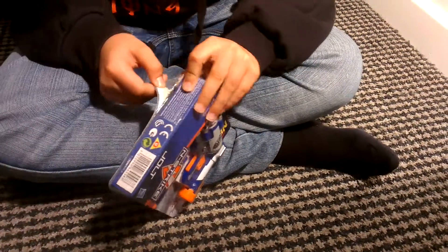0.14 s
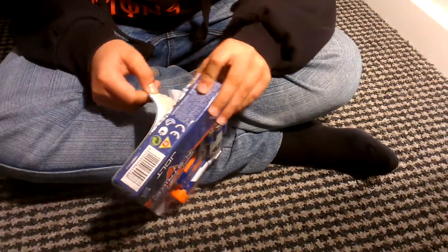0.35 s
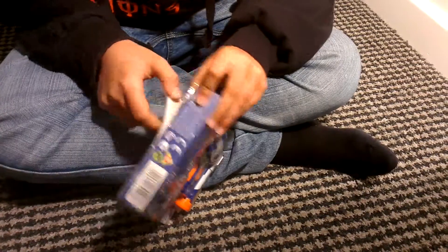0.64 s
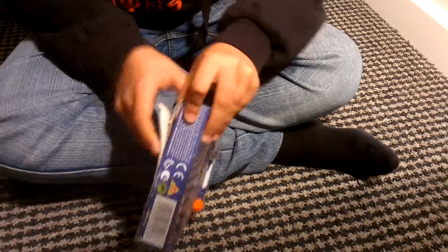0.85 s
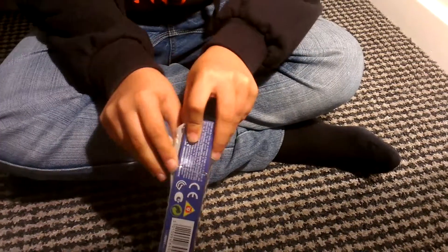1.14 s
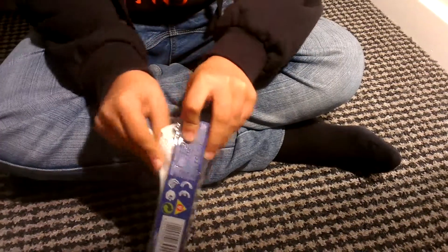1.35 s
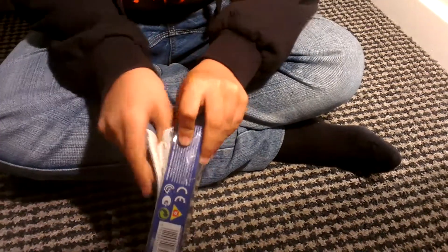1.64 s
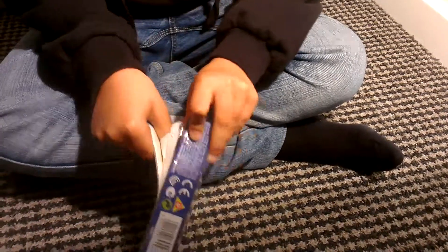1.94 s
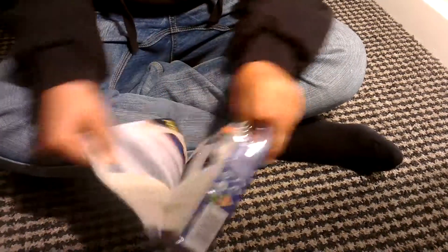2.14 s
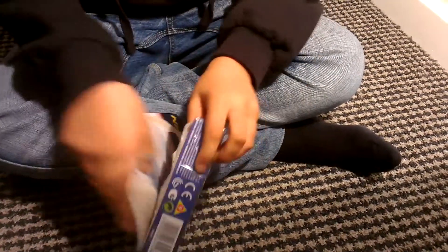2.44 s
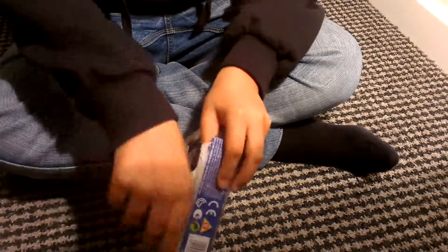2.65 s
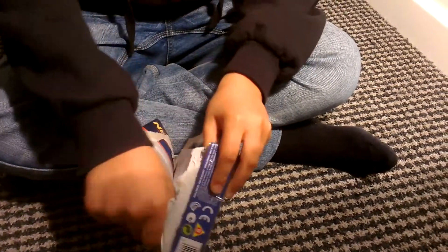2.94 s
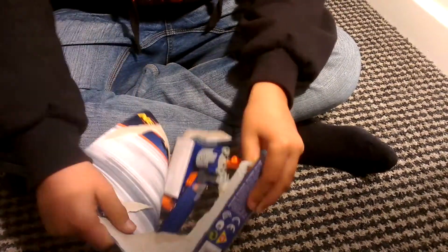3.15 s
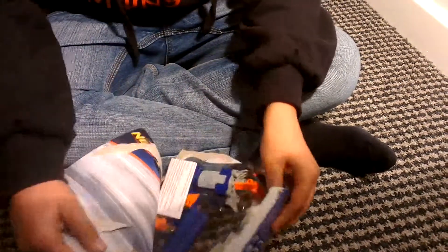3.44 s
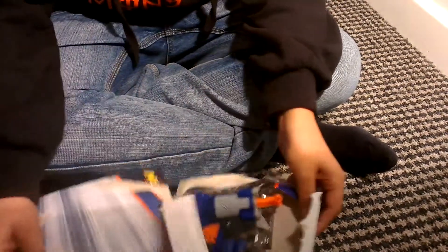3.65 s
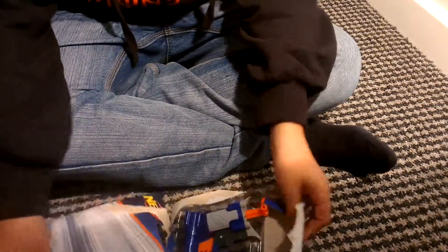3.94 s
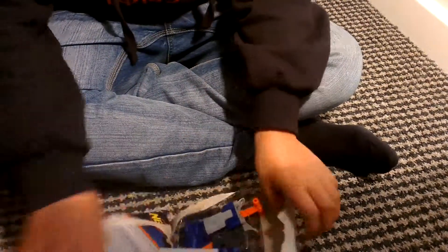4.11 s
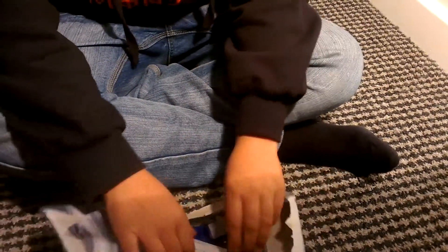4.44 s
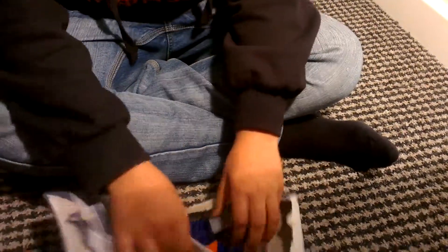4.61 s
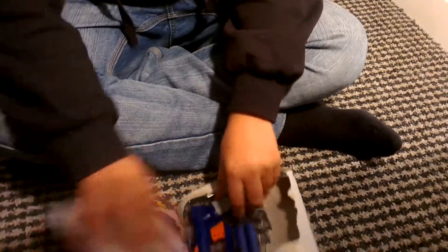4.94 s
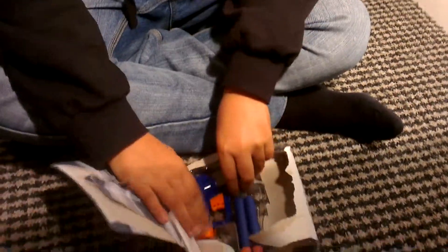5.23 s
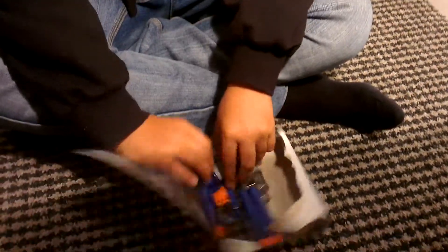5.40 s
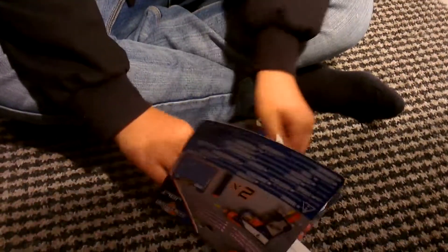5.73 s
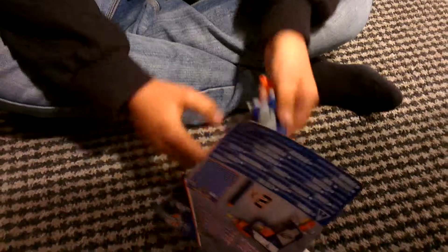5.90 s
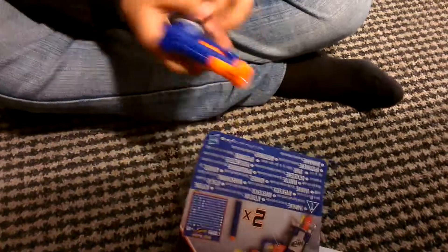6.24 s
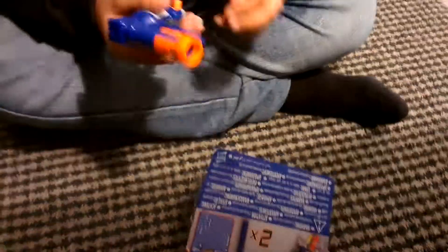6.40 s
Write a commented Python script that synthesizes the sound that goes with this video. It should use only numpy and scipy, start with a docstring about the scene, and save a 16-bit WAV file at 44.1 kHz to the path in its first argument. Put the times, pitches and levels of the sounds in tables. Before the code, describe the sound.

Stiff card and plastic packaging crackles, rips and snaps as it is pulled open, then rustles more softly.

```python
"""On a carpet, close to two microphones and nearer the left, hands tear open a card-and-plastic toy pack.
Tearing fibres and rubbing give a dense crackle of tiny clicks that swells with each rip, slide and scrape;
creases and the plastic shell snap now and then. Three streams of clicks, loosely bunched together,
sound as card panel (low), creak (middle) and fizz (high).
Nearby surfaces smear the sound, and a faint hiss lies underneath."""
import sys
import numpy as np
from scipy import signal
from scipy.fft import rfft, irfft
from scipy.io import wavfile
from scipy.ndimage import uniform_filter1d

SR = 44100
rng = np.random.default_rng(int(sys.argv[2]) if len(sys.argv) > 2 else 0)


def wrap_up_sound(samples):
    """Save the sound to the file named by the first command line argument, as 16-bit audio."""
    columns = np.atleast_2d(samples).T
    # keep every value between -1 and 1, then stretch to whole-number steps
    tamed = np.clip(columns, -1, 1)
    steps = np.round(tamed * 32767).astype(np.int16)
    wavfile.write(sys.argv[1], SR, steps)


N = 289416
T, HZ = np.arange(N) / SR, np.fft.rfftfreq(N, 1 / SR)

# Rips, slides and scrapes. Each row: start and swell time in seconds, swell in dB, peak creak drive in dB,
# panel and fizz in dB over the creak, nominal seconds to fade 20 dB (negative cuts the swell short).
HAND_STROKES = [(.05, 0.065, 12.5, -55, -29, 15, 0.0579), (0.198, 0.083, 10.5, -51, -15, 11.5, 0.0146),
                (.278, 0.0512, 5, -45, -16, 14.5, 0.0269), (0.494, 0.0123, 2.5, -62.5, 0.5, 2.5, 0.08),
                (.65, 0.0838, 21, -68, -2, 5.5, 0.2248), (1.14, 0.0476, 10, -60, -4.5, 4.5, 0.097),
                (1.282, 0.0055, -7, -42.5, -6, -2, 0.101), (1.604, 0.0454, 9, -61.5, -2, 1, 0.1041),
                (1.765, 0.0184, 13.5, -73.5, -1, -4, 0.07), (1.87, 0.0392, 12.5, -65, -3.5, 0, 0.03),
                (1.95, 0.044, 9, -71, -8.5, 3, 0.27), (2.049, 0.0805, 14.5, -17, -4, 3.5, 0.051),
                (2.129, 0.0308, 2.5, -24.5, 5, -19, 0.0441),
                (2.199, 0.01785, 26.5, -28.5, -1, -31.5, 0.0559), (2.323, 0.0285, 2.5, -47, 1, -17.5, 0.13),
                (2.42, 0.02, 6, -54.5, -5.5, -3, 0.46), (2.57, 0.02, 5.5, -57, -1.5, -20.5, 0.86),
                (2.999, 0.0173, 4.5, -26.5, 2, 8.5, 0.0608), (3.03, 0.0273, 0.5, -26, -4, 2.5, 0.0448),
                (3.084, 0.022, 21, -16, -2.5, -6.5, 0.0555), (3.228, 0.09735, 29.5, -26.5, -5.5, 5.5, .05),
                (3.364, 0.0081, 9, -46.5, 4, -9, 0.0719), (3.488, 0.0292, 6.5, -29.5, 1.5, -0.5, 0.0303),
                (3.518, 0.00237, -2, -21, 3, -11, 0.0433), (3.53, 0.0349, 3.5, -25.5, -1.5, 5.5, 0.0322),
                (3.568, 0.026, 1, -29.5, 1, -4.5, 0.0528), (3.742, 0.0046, -6, -39, 0.5, -15, 0.0952),
                (3.97, 0.0273, 7.5, -56, 0.5, -13.5, 0.3723),
                (4.025, 0.01686, 29, -34.5, -2.5, -9.5, 0.0556), (4.2, 0.0754, 12.5, -48.5, -10, 2, .15),
                (4.31, 0.027, 3.5, -59.5, -20, 8.5, 0.28), (4.399, 0.02774, 41, -40.5, -2, -21.5, 0.0917),
                (4.58, 0.048, 7, -55.5, -5, 3.5, 0.27), (4.859, 0.0215, 13.5, -46.5, -2.5, -6, 0.058),
                (4.983, 0.0074, 6, -43, 6, -10.5, 0.0511), (4.98, 0.0596, 4.5, -55, -12, 10.5, 0.027),
                (5.081, 0.0706, 5, -53.5, -8, 1, 0.0332), (5.2, 0.0411, 3, -62, -3, -4, -0.0053),
                (5.3, 0.0695, 22, -56.5, -0.5, -5.5, 0.1429), (5.4, 0.105, 7, -57.5, -4, -3, 0.0417),
                (5.57, 0.034, 6.5, -63.5, -5, -4, 0.16), (5.681, 0.0304, 5, -56, -8.5, -12, 0.1654),
                (5.82, 0.0737, 18.5, -56, -5.5, -6, 0.1223), (5.97, 0.015, 10, -66, -1, -8.5, 0.1753),
                (6.031, 0.0362, 19, -54, -6, 0, 0.0519), (6.19, .012, 4.5, -63, -8.5, -4, 0.1134)]
# Quiet handling between the strokes. Each row: time in seconds, creak drive in dB.
QUIET_HANDLING = [(0, -54.5), (.2, -63), (.42, -67.5), (.6, -90.5), (.72, -76), (0.859, -56.5),
                  (1.0, -67.5), (1.12, -84), (1.85, -87), (2.04, -84), (2.239, -58.5), (2.981, -59.5),
                  (3.8, -59), (3.89, -81.5), (3.96, -58.5), (4.4, -60), (4.7, -59), (5.2, -61), (5.27, -84),
                  (5.36, -67.5), (5.56, -78), (5.7, -65), (5.81, -75.5), (6.05, -76), (6.139, -84),
                  (6.28, -84), (6.36, -94), (6.56, -87)]
# Snaps of creases and shell. Each row: start in seconds, creak in dB, panel and fizz in dB over the creak
# (all before trims), panel pitch in Hz, nominal seconds to die away by 60 dB.
PACK_SNAPS = [(0.088, -52.5, -10, 11, 940, 0.043), (0.117, -55.5, -6.5, 11.5, 947, 0.058),
              (0.205, -41, -22, 8, 1220, 0.0234), (0.227, -49.5, -8, 12, 930, 0.05),
              (0.289, -39, -3, 12.5, 889, 0.232), (0.4316, -43, -30.5, -3, 1270, 0.076),
              (0.4489, -36.5, 9, -26, 915, 0.0644), (0.5013, -54.5, 3, -5.5, 892, 0.12),
              (0.8804, -35, 0.5, -7, 824, 0.0484), (0.9259, -32.5, -7.5, 7.5, 898, 0.0488),
              (0.9415, -44, -8, -8.5, 930, 0.096), (1.017, -51, -2.5, 6, 824, 0.145),
              (1.1606, -51, -4.5, -5.5, 1262, 0.203), (1.285, -22.5, -19, 8, 960, 0.0695),
              (1.2876, -26.5, 6, -18.5, 1094, 0.0264), (1.304, -53, -22, 15, 1087, 0.135),
              (1.472, -51, -2.5, -37, 931, 0.0706), (1.6015, -55, 16, 0.5, 843, 0.059),
              (1.9103, -50.5, -20, -18.5, 1195, 0.052), (2.0496, -20.5, -4, -27, 826, 0.102),
              (2.136, -19.5, -22, -3, 810, 0.108), (2.1495, -7.5, -3, -4.5, 925, 0.0594),
              (2.207, -17.5, -28, -17, 770, 0.0414), (2.2209, -11, -18, -29, 676, 0.035),
              (2.2802, -35, -11, -23, 822, 0.151), (2.3279, -22, -9.5, -1, 677, 0.0737),
              (2.3482, -13.5, -5, -10.5, 832.6, 0.0309), (2.5302, -35.5, -2.5, -9, 698, 0.08),
              (2.572, -23, -7.5, -19, 801, 0.065), (2.5936, -31, 2, -16, 1071, 0.0677),
              (2.6998, -27.5, -2.5, -7.5, 1048, 0.0582), (2.8666, -32.5, -10, -0.5, 678, 0.0453),
              (2.9307, -24, -7.5, -5.5, 1127, 0.0386), (2.9985, -14.5, -2.5, -2, 775, 0.106),
              (3.0487, -4.5, -12.5, -15.5, 931, 0.0623), (3.1045, -3.5, -4.5, -13, 872, 0.0518),
              (3.1804, -35.5, -4, -10, 891, 0.133), (3.3726, -16, -12, -1, 928, 0.0202),
              (3.4486, -27, -1.5, 5.5, 631, 0.0423), (3.4717, -28.5, -17.5, -11, 608.8, 0.103),
              (3.495, -23, 2.5, 2.5, 1104, 0.049), (3.5104, -15, 2.5, 3, 870, 0.113),
              (3.5188, 0.5, -14, -11.5, 755, 0.08), (3.5594, -7.5, -25, -2.5, 1080, 0.053),
              (3.6563, -23, -3.5, -22.5, 670, 0.0285), (3.7059, -56.5, 21.5, -2, 657, 0.11),
              (3.7434, -9.5, -0.5, -12, 763.5, 0.0337), (3.7955, -27, 6, -4, 949, 0.0348),
              (3.936, -28, 5.5, -41, 1401, 0.0409), (3.9666, -45, -1.5, -9.5, 1063, 0.138),
              (4.0105, -24.5, -11, -7, 757, 0.0183), (4.033, -33, 0.5, -16, 825, 0.066),
              (4.358, -33, -13.5, 4, 800, 0.051), (4.436, -17.5, -9.5, -30, 883, 0.0197),
              (4.5973, -30.5, -11, -20, 840, 0.074), (4.6333, -36.5, -22, -3, 1262, 0.105),
              (4.6783, -37, -15, -19, 1107, 0.086), (4.8826, -25, -10, -5, 735, 0.0605),
              (4.9864, -41.5, 10.5, -13, 1298, 0.065), (5.06, -29, -5, -13.5, 945, 0.0269),
              (5.2038, -42.5, -23.5, -30, 913, 0.1016), (5.3991, -34, -1.5, -22, 909.5, 0.0329),
              (5.421, -40, -6, -11, 893, 0.0245), (5.4814, -40, -13.5, 1, 928, 0.06),
              (5.571, -51, -9, -8, 1287, 0.1), (5.6208, -42, -7, -14, 700, 0.03),
              (5.678, -34, -10.5, -26.5, 742.5, 0.05), (5.772, -49.5, 1.5, -10.5, 651, 0.033),
              (5.8846, -39.5, -13, -14.5, 638.2, 0.179), (5.924, -49.5, -1.5, 8.5, 582.7, 0.0517),
              (6.0171, -44.5, -18, 2.5, 1276, 0.0453), (6.0616, -51, -10.5, 2.5, 911, 0.08),
              (6.1533, -47.5, -10.5, 8, 1343, 0.1377), (6.1913, -39.5, -24, -1.5, 1260, 0.107),
              (6.382, -72, 10.5, -19.5, 500.5, 0.019), (6.4204, -60.5, -2, -8.5, 1335, 0.075)]
# Tone of pack and microphone together. Each row: frequency in Hz, relative level in dB.
PACK_TONE = [(88, -58), (150, -43), (308, -28), (472, -16.5), (723, -1), (1320, -4.5), (1570, -3),
             (1910, -8), (2230, -3), (2980, -1.5), (4850, -10.5), (9760, -4.5), (11800, -18),
             (13800, -19.5), (15600, -35.5)]
# Reflections off hands, lap and carpet. Each row: frequency in Hz, seconds to die away by 60 dB.
REFLECTION_DECAY = [(400, 0.077), (1500, 0.075), (5000, 0.1), (12000, 0.12)]
# How alike the two sides sound. Each row: frequency in Hz, likeness from 0 to 1.
STEREO_LIKENESS = [(60, 0.13), (240, 0.31), (950, 0.91), (3770, 0.19), (15000, 0.48)]
# Stereo balance. Each row: frequency in Hz, left over right in dB.
LEFT_LEAN = [(60, 14), (180, -2.5), (550, 5.5), (1650, 8.5), (4970, 7), (15000, 11.5)]
# Tone of the hiss. Each row: frequency in Hz, relative level in dB.
HISS_TONE = [(59, -62.5), (100, -23.5), (492, -4), (2630, -11), (5840, -5.5), (9660, -9.5), (15000, -36)]


def tearing(drive):
    """Fibres tear and rub in a dense crackle that follows the effort of the hands."""
    return drive * clicks(per_s=9000, spread_db=3.0, clump_db=3.466)


def hand_effort():
    """How hard the hands drive panel, creak and fizz, as gains: quiet handling plus every stroke."""
    times, handling_db = np.transpose(QUIET_HANDLING)
    power = gain_of(np.interp(T, times, handling_db) + np.array([[-6], [0], [-2]])) ** 2
    attack_s, fade_speed = 0.0022, [1.287, 1.155, 1.283]  # the creak lingers longest
    for start, swell, swell_db, creak_db, panel_db, fizz_db, fade in HAND_STROKES:
        t = T[:round((swell + 4 * fade) * SR)]
        rising = np.minimum(t / swell - 1, 0)
        fading = np.outer(fade_speed, np.maximum(t - swell, 0)) / fade
        level_db = np.array([[panel_db], [0], [fizz_db]]) + creak_db + swell_db * rising - 20 * fading
        add(power, start, gain_of(level_db) ** 2 * np.minimum(t / attack_s, 1))
    return np.sqrt(power)


def snapping():
    """A crease or the shell snaps: a tick and a dying burst. Returns the clicks and the panel's ring."""
    drive, ring, t = np.zeros((3, N)), np.zeros(N), T[:SR // 5]
    crackle = clicks(per_s=9000, spread_db=2.8, clump_db=0.77)
    decay_speed = np.array([[.9], [1.05], [1.4]])  # the fizz dies first
    attack_s, tick_t60_s, ring_t60_s = 0.001494, 0.0078, 0.036
    for start, creak_db, panel_db, fizz_db, hz, t60 in PACK_SNAPS:
        first = round(start * SR)
        burst = gain_of(creak_db - 9.5 - 60 * decay_speed * t / max(t60, .01))
        tick = gain_of(creak_db - 8.5 - 60 * t / tick_t60_s)
        envelope = burst * (1 - np.exp(-t / attack_s)) + tick
        hits = envelope[:, :N - first] * crackle[:, first:first + len(t)]
        add(drive, start, gain_of([[panel_db - 3.5], [0], [fizz_db]]) * hits)
        # the bent panel has another pitch in every grip
        mode = gain_of(-60 * t[:2000] / ring_t60_s) * np.sin(2 * np.pi * hz * t[:2000])
        add(ring, start, gain_of(panel_db) * signal.fftconvolve(hits[0], mode / np.linalg.norm(mode)))
    low_cut = signal.butter(4, 480., "high", fs=SR, output="sos")  # the ring carries no bass
    return drive, signal.sosfilt(low_cut, ring)


def clicks(per_s, spread_db, clump_db):
    """Three streams of tiny clicks, a few large, bunched in partly shared millisecond clumps."""
    size = gain_of(spread_db * np.minimum(rng.exponential(1, (3, N)), 4))
    fires = rng.random((3, N)) < per_s / SR
    shared, *own = uniform_filter1d(uniform_filter1d(rng.standard_normal((4, N)), size=150), size=150)
    clumps = gain_of(clump_db * evened(shared + 1.9 * np.array(own)))
    return evened(size * fires * rng.choice([-1., 1.], (3, N)) * clumps)


def pack_voices():
    """One click shape per stream: the pack's tone split into panel, creak and fizz, of equal energy."""
    hz = abs(np.fft.fftfreq(4096, 1 / SR)) + 1
    below_creak, below_fizz = (1 / (1 + (hz / crossover_hz) ** 6) for crossover_hz in (1500, 5000))
    bands = np.sqrt([below_creak, (1 - below_creak) * below_fizz, 1 - below_fizz])
    log_gain = np.log(gain_of(curve_at(PACK_TONE, hz)) * bands + 1e-5)
    spectra = np.exp(np.conj(signal.hilbert(log_gain)))  # minimum phase keeps the attack sharp
    shapes = np.fft.ifft(spectra).real[:, :1024]
    return shapes / np.linalg.norm(shapes, axis=1, keepdims=True)


def rubbing(panel_effort, panel_snaps):
    """Dull noise of fingers and cloth on the card; it grows more slowly than the panel's flexing."""
    snap_power = abs(uniform_filter1d(panel_snaps ** 2, size=400, origin=199))
    flexing = np.sqrt(panel_effort ** 2 + gain_of(6) * snap_power)
    band = signal.butter(3, [260., 500.], "band", fs=SR, output="sos")
    return gain_of(-32) * flexing ** 0.7318 * evened(signal.sosfilt(band, rng.standard_normal(N)))


def nearby_surfaces(pack, wet_db, turns_per_s):
    """Direct sound with a short spray of reflections, and a second path; both shift as the pack moves."""
    taps = rng.choice([-1., 1.], (3, 2, 8192)) * (rng.random((3, 2, 8192)) < .1)
    hz, t, spectra = signal.stft(taps, SR, nperseg=128)
    decay = gain_of(-60 * t / curve_at(REFLECTION_DECAY, hz)[:, None])
    tails = signal.istft(spectra * decay, SR, nperseg=128)[1]
    tails /= np.linalg.norm(tails, axis=2, keepdims=True)
    crossfade = np.sqrt(2 / 3) * np.cos(np.pi * (turns_per_s * T + np.arange(3)[:, None] / 3))
    spray, second_path = signal.oaconvolve((pack * crossfade)[:, None], tails, axes=2).sum(0)[:, :N]
    wet = gain_of(wet_db)
    return np.array([(pack + wet * spray) / np.hypot(1, wet), second_path])


def microphones(paths):
    """The right microphone hears a mostly weaker blend of the left's sound and the second path."""
    near, second = rfft(paths)
    likeness = curve_at(STEREO_LIKENESS, HZ)
    lean = gain_of(curve_at(LEFT_LEAN, HZ) / 2)
    blend = likeness * near + np.sqrt(1 - likeness ** 2) * second
    return irfft([near * lean, blend / lean], N)


def hiss():
    """A faint steady bed of room and microphone noise."""
    spectrum = rfft(rng.standard_normal((2, N))) * gain_of(curve_at(HISS_TONE, HZ))
    return gain_of(-91.5) * evened(irfft(spectrum, N))


def gain_of(db):
    """Decibels to gain."""
    return 10 ** (np.asarray(db) / 20)


def evened(x):
    """Scales to rms 1."""
    return x / np.sqrt(np.mean(x ** 2) + 1e-20)


def curve_at(points, hz):
    """Reads a table on a log-frequency axis."""
    point_hz, value = np.transpose(points)
    return np.interp(np.log(hz + 1), np.log(point_hz + 1), value)


def add(mix, start_s, sound):
    """Lays a sound into the mix."""
    part = mix[..., round(start_s * SR):][..., :sound.shape[-1]]
    part += sound[..., :part.shape[-1]]


def scene():
    """Tears and snaps sound through the pack, the surfaces around it and the microphone pair."""
    snaps, ring = snapping()
    effort = hand_effort()
    crackle = signal.oaconvolve(tearing(effort) + snaps, pack_voices(), axes=1)[:, :N].sum(0)
    pack = crackle + ring + rubbing(effort[0], snaps[0])
    return microphones(gain_of(0.5) * nearby_surfaces(pack, wet_db=-3.5, turns_per_s=8) + hiss())


def record(dry):
    """The loudest cracks flatten at full scale; a steep high cut then trims the top."""
    high_cut = signal.firwin(511, 15700, window=("kaiser", 9), fs=SR)
    return signal.oaconvolve(np.clip(dry, -1, 1), high_cut[None], "same")


dry = scene()
out = record(dry)
wrap_up_sound(out)
```